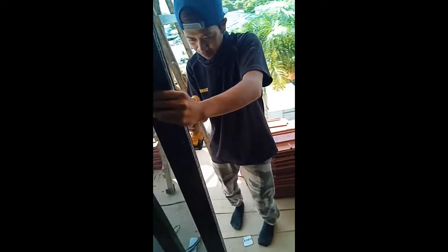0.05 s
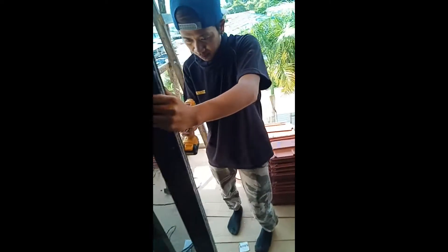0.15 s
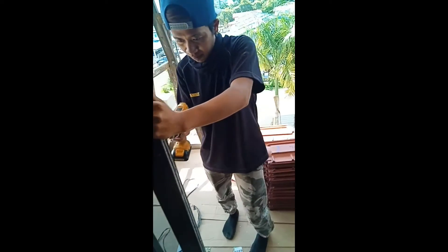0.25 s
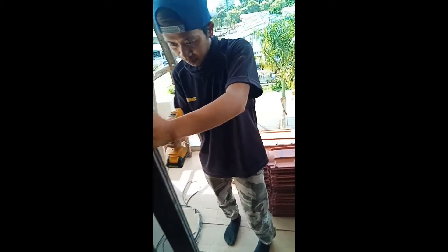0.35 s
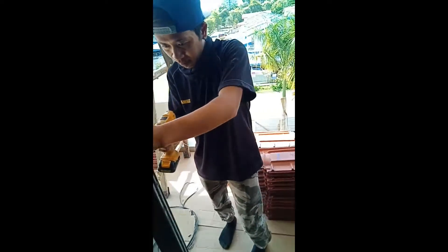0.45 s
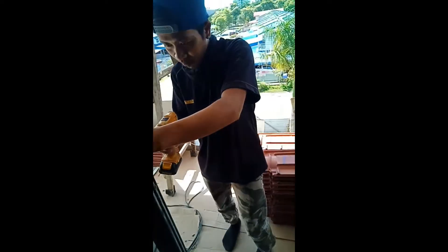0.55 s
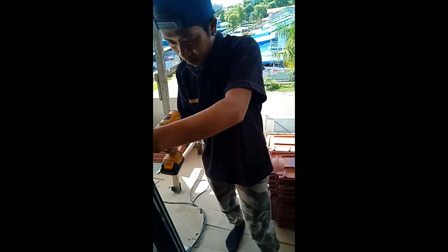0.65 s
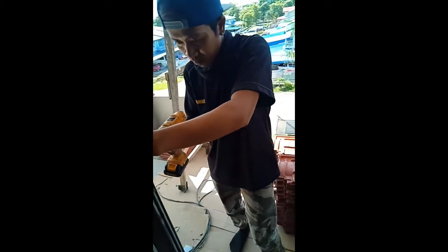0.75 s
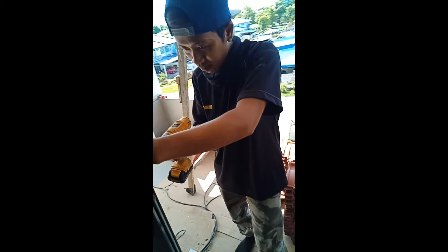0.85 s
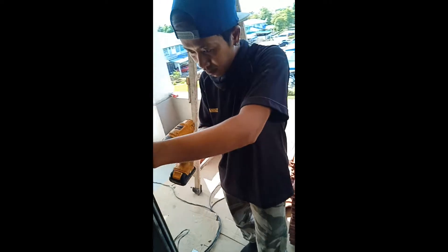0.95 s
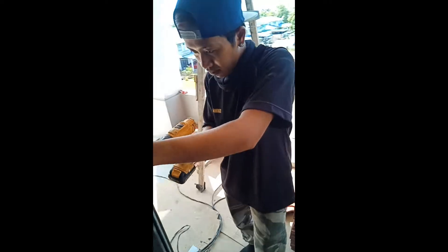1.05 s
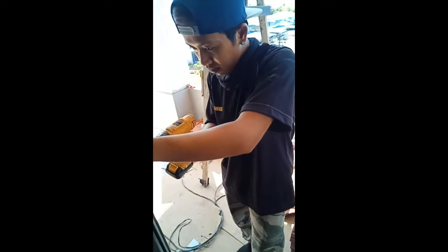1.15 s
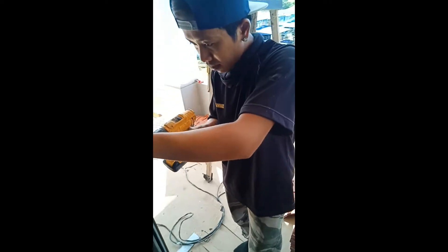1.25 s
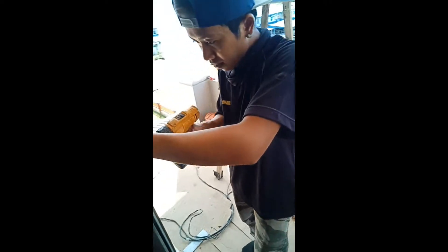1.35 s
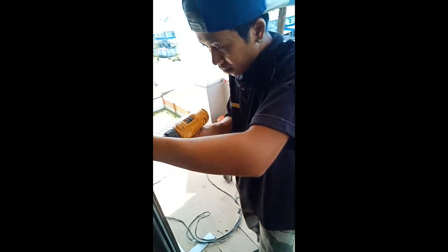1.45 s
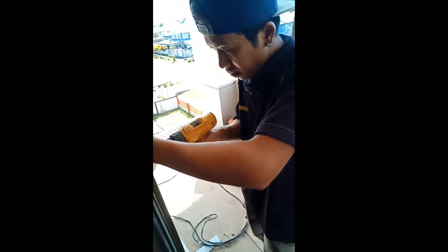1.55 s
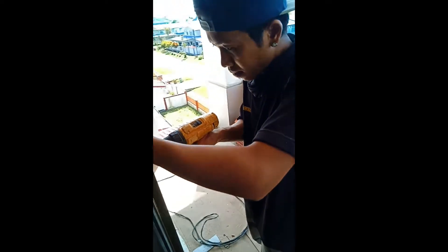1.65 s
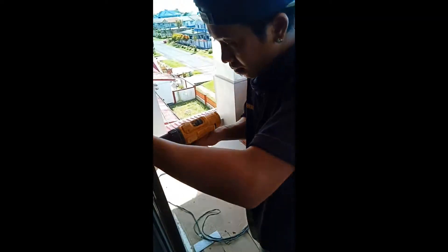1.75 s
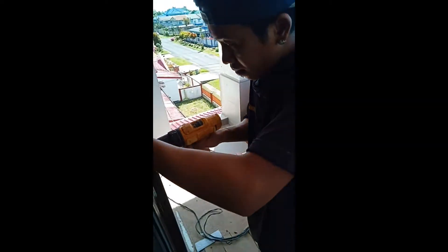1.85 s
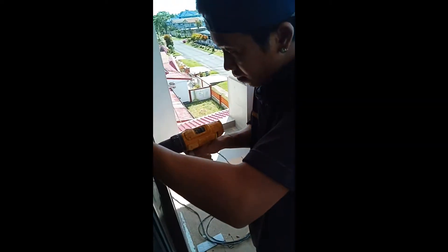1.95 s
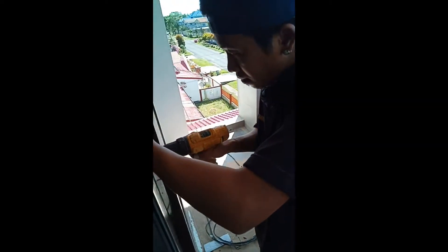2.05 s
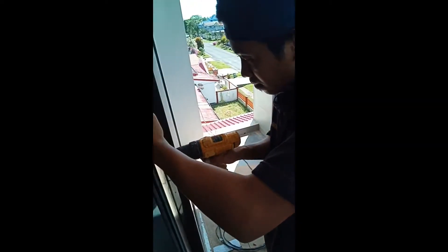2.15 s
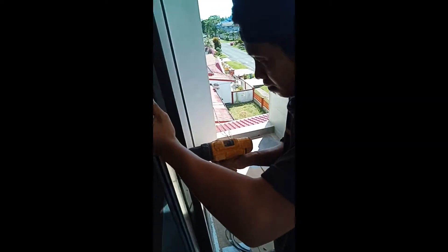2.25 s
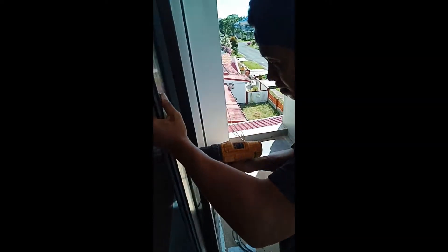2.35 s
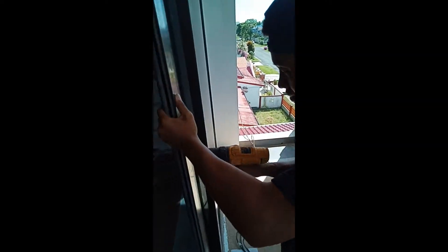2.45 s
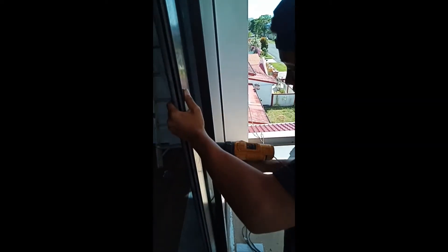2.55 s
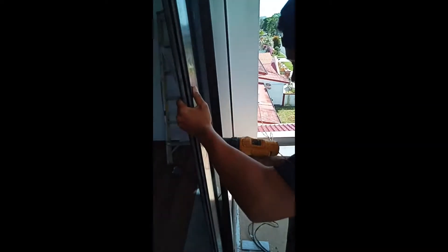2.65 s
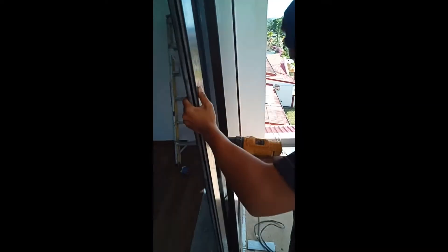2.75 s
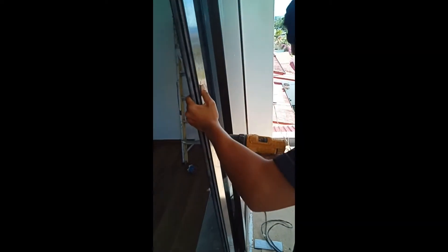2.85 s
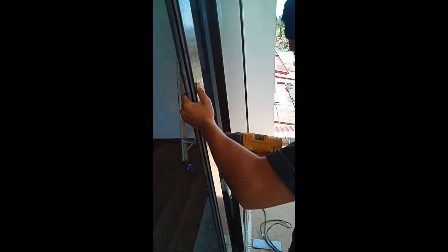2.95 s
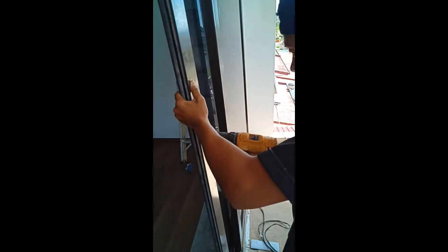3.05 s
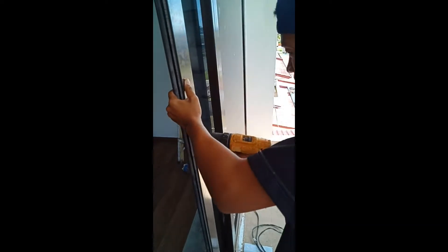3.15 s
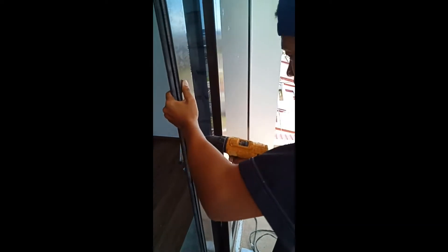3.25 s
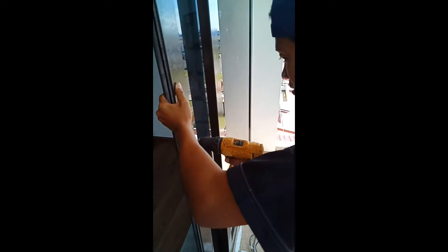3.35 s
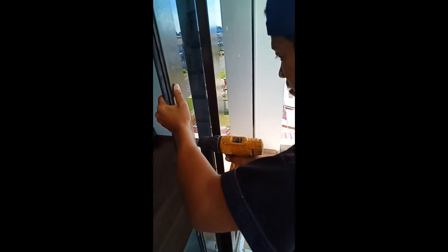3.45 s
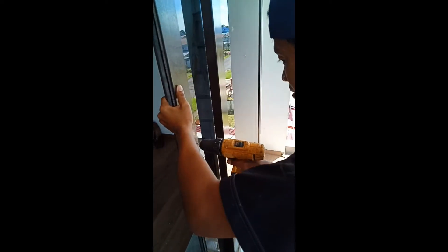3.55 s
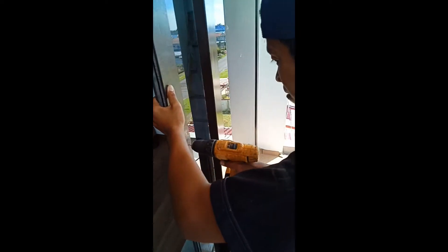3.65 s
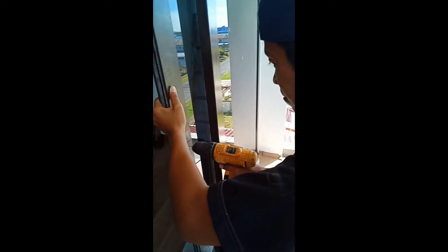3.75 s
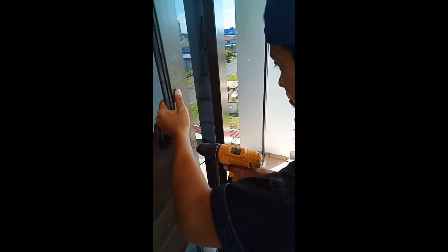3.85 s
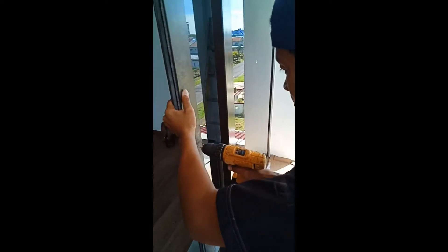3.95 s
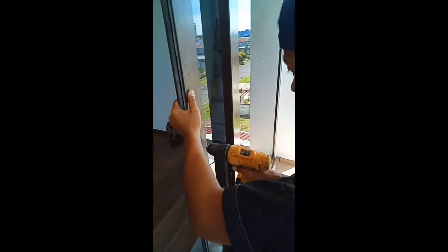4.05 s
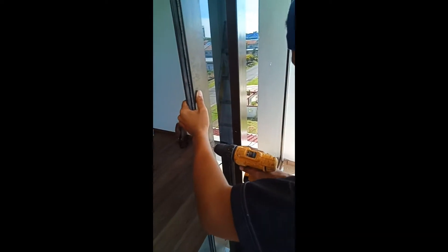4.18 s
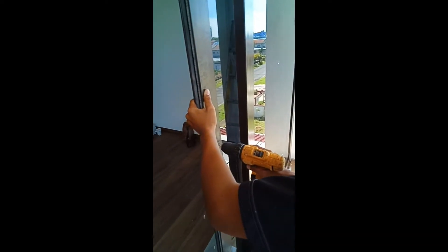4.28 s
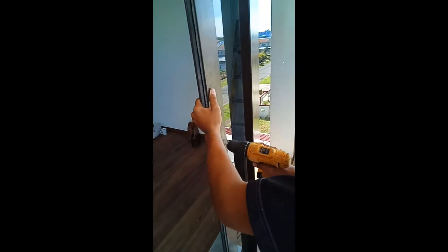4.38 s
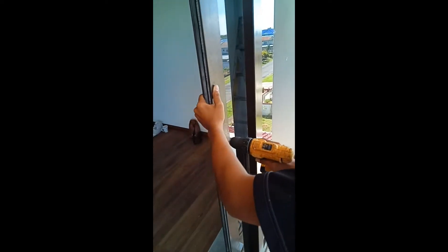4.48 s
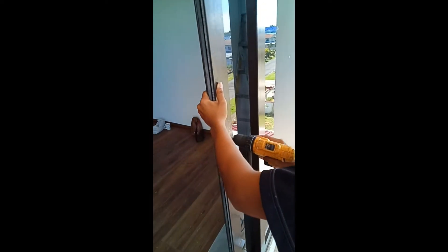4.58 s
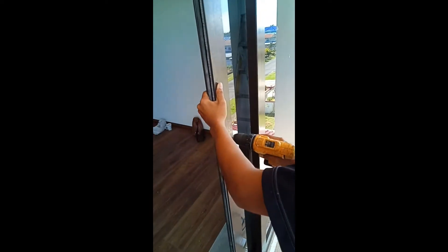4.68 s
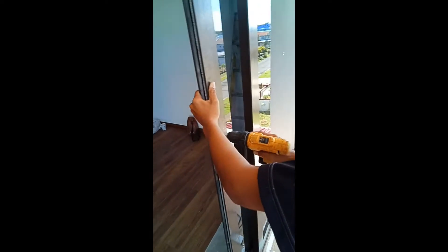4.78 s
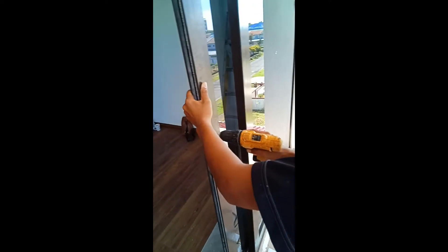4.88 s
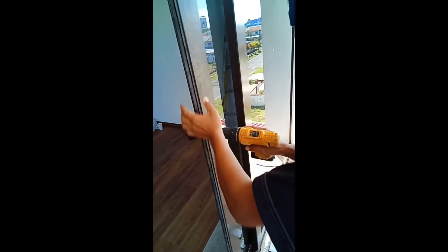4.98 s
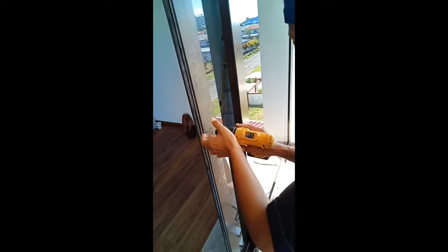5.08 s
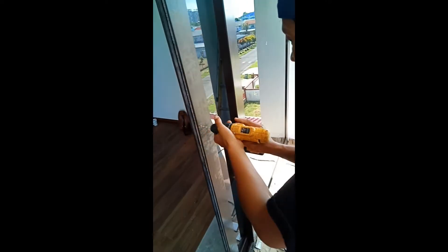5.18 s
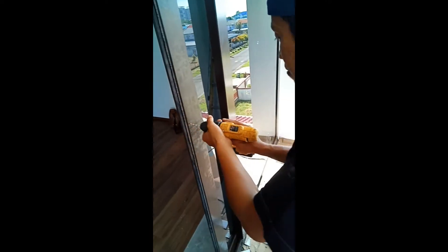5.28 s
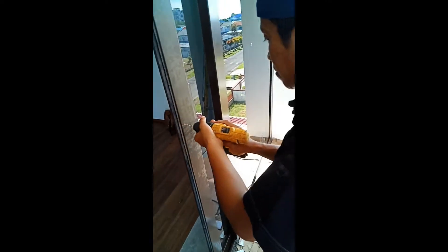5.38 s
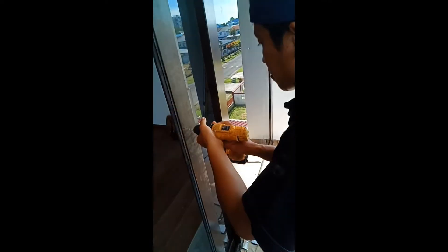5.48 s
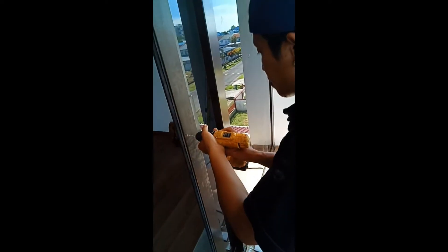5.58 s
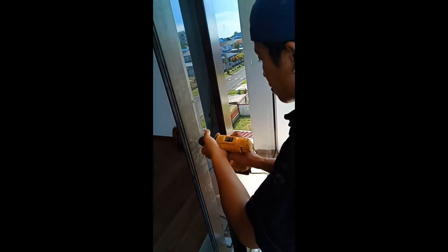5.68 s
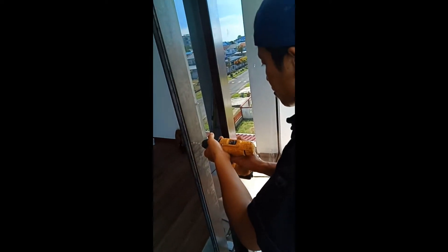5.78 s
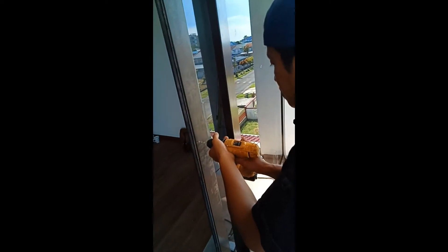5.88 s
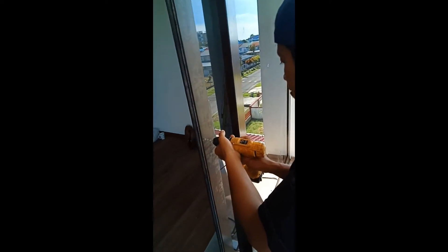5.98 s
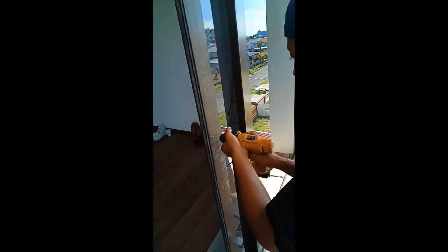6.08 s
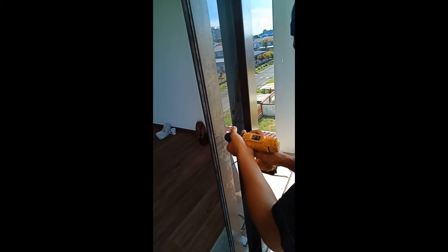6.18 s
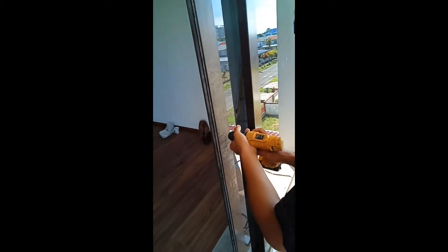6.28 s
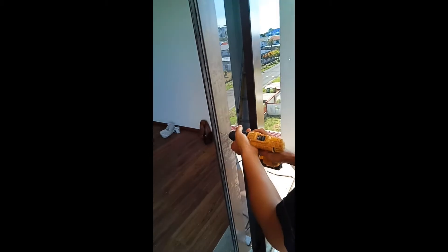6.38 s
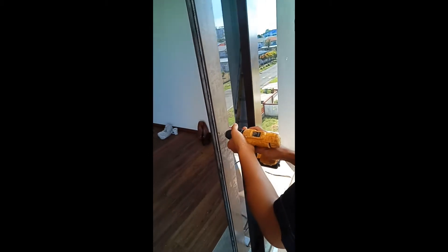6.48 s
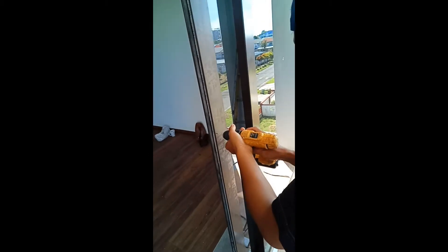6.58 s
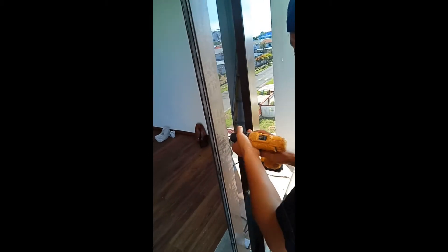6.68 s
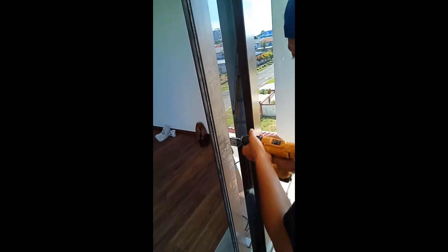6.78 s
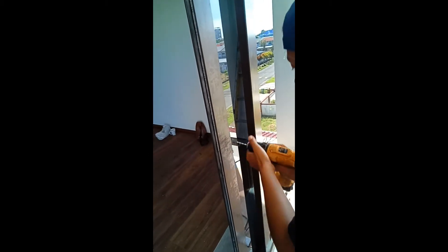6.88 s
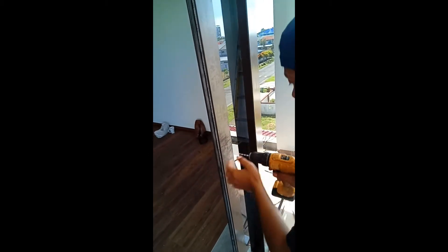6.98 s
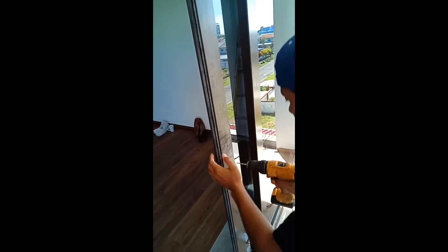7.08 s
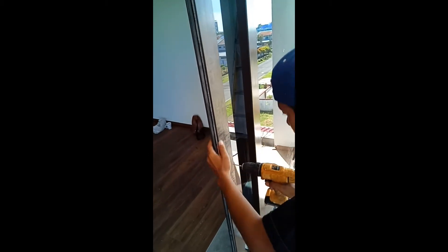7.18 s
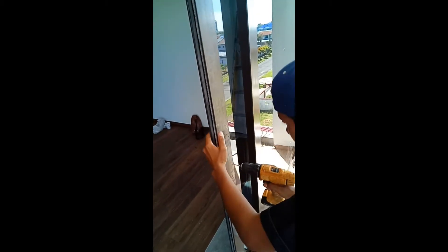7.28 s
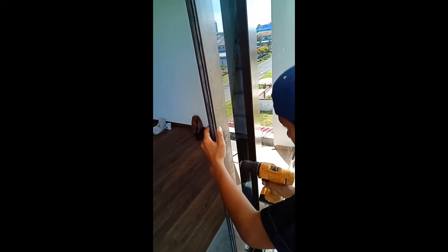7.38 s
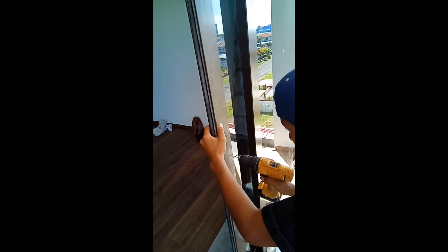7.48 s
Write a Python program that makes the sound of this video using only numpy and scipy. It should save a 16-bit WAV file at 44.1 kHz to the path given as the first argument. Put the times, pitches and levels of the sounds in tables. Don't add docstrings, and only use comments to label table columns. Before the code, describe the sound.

Quiet street hiss and soft wind rumble sit behind a drill at arm's length. A trigger tick and a faint whistle lead into a rising whine and dense gear rattle, held for about two seconds, then falling away with snaps. Later two short trigger bursts crackle, the second strongest and longer, stopped abruptly by the brake. The doorway adds a short echo; the phone sound is dry, bright and close.

```python
import sys
import numpy as np
from scipy import signal
from scipy.fft import rfft, irfft, next_fast_len
from scipy.io import wavfile
from scipy.ndimage import uniform_filter1d

SR = 44100
rng = np.random.default_rng(int(sys.argv[2]) if len(sys.argv) > 2 else 0)


def inscribe(sig):
    pcm = np.round(np.clip(np.atleast_2d(sig).T, -1, 1) * 32767)
    wavfile.write(sys.argv[1], SR, pcm.astype(np.int16))


def volts_from_decibels(level):
    exponent = np.asarray(level, float) / 20
    return 10 ** exponent


N = 331808

# (time [s], level [dB])
STREET_LEVEL = [(0, -50.5), (.4, -54), (1.6, -55), (2.5, -61.5), (5.2, -53), (7.52, -57)]
# (frequency [Hz], density [dB per Hz])
STREET_COLOUR = [(260, -57), (450, -40), (653, -19.5), (803, -9.5), (975, -8.5), (1150, -8.5), (1460, -10),
                 (1550, -11), (1770, -13), (2210, -15.5), (3500, -18.5), (4850, -39), (15700, -67.5)]
# (time [s], centre [Hz], level [dB])
DRONE = [(0, 953, -56), (.6, 1023, -59), (1.4, 1282, -54.5), (2.2, 1512, -51), (2.5, 1550, -54)]
# (middle [s], peak [dB], half length [s])
HUM = [(.7, -52, 0.31), (3.2, -51.5, 0.49), (4.4, -51.5, 0.41), (5.4, -53.5, .4), (6.12, -41, 0.17),
       (6.78, -39.5, .08), (7.05, -53, 0.19), (7.33, -47.5, 0.076)]

# (time [s], level [dB])
CALM = [(0, -54.5), (1.6, -48.5), (5.2, -51.5), (7.37, -51), (7.44, -63), (7.52, -49.5)]
# (middle [s], peak [dB], half length [s])
GUSTS = [(1.04, -51, 0.074), (1.16, -44.5, 0.11), (2.3, -42.5, 0.13), (2.95, -48, 0.098),
         (3.72, -42.5, .05), (3.92, -43, 0.048), (4.3, -38, 0.11), (4.45, -41.5, .05), (4.7, -44.5, .12),
         (5.45, -34, 0.037), (5.57, -35.5, 0.084), (5.78, -42.5, 0.12), (5.845, -41, 0.024),
         (6.38, -39, 0.18), (6.655, -26, 0.049), (6.76, -30, 0.063), (6.93, -37, .08)]
# (frequency [Hz], density [dB per Hz])
BREEZE_COLOUR = [(15, -68), (25, -33.5), (113, -4), (167, 1.5), (200, 0.5), (233, 0), (299, 0), (508, -5),
                 (560, -8), (700, -13), (910, -32.5), (1540, -120)]

# (time [s], level [dB])
CHOPPER_LEVEL = [(1.44, -69), (1.454, -44.5), (1.62, -44), (1.69, -67), (1.73, -52), (2.136, -38),
                 (2.244, -43), (2.3, -55)]

# (time [s], commutator pitch [Hz], commutator level [dB])
SPIN_UP = [(2.1, 1300, -51), (2.22, 1610, -47), (2.3, 2254, -42), (2.4, 2610, -28.5), (2.44, 2964, -34),
           (2.5, 3595, -26), (2.55, 3800, -32)]
BORING = [(2.7, 3920, -42), (2.8, 3987, -32), (3.06, 4000, -34.5), (3.27, 4007, -28.5), (3.32, 4005, -45),
          (3.65, 3975, -33), (3.9, 3933, -31), (4.12, 3945, -33)]
RUN_DOWN = [(4.2, 3694, -29.5), (4.27, 3473, -29), (4.33, 3245, -42), (4.41, 2810, -31), (4.49, 2600, -27),
            (4.53, 2201, -47)]
# (time [s], commutator pitch [Hz], level [dB])
STALLED = [(5.435, 2360, -30), (5.46, 2740, -29), (5.51, 2733, -34), (5.55, 2851, -32), (5.595, 2710, -28),
           (5.62, 2710, -40.5)]
HELD = [(6.1, 2600, -38.5), (6.16, 3331, -23.5), (6.235, 3508, -18.5), (6.295, 3460, -20),
        (6.32, 3107, -29), (6.39, 3428, -23), (6.5, 3400, -20), (6.61, 3874, -19.5), (6.695, 3497, -24.5)]
SINGING = [SPIN_UP + BORING + RUN_DOWN, STALLED, HELD]
# (multiple of its turn [1], level beside a steady rotor [dB])
TURN_LINES = [(.5, -49), (1, -52), (1.31, -54), (2, -58), (2.5, -52), (3, -45), (4, -49), (24, -75),
              (28, -84), (34, -82), (35, -82), (36, -84)]
COMMUTATOR_BARS = 12
TOP_SPEED_HZ, FREE_SPEED_HZ = 3786, 4000
WOBBLE_FROM_S, WOBBLE_TO_S, WOBBLE_PERIOD_S, WOBBLE_DEPTH = 6.157, 6.5, .051, .02

# (time [s], gear effort [dB], share passed into the frame [dB])
PULLS = [
    [(.9, -69.5, 11), (1.45, -52, 1.5), (1.6, -43, -4), (2.0, -40.5, -8), (2.55, -22, -11),
     (3.4, -24.5, -7.5), (4.45, -24, -8.5), (4.7, -27, -2.5), (4.9, -43.5, -3)],
    [(5.381, -26, -11), (5.407, -28.5, -9), (5.412, -22, -8.5), (5.58, -22.5, -11), (5.63, -28, -7.5),
     (5.69, -44, -1)],
    [(6.049, -25.5, -6.5), (6.075, -23, -5), (6.08, -19, -4.5), (6.14, -23, -5.5), (6.19, -18, -14.5),
     (6.57, -21.5, -10.5), (6.64, -17.5, -9.5), (6.71, -21, -4), (6.77, -36, -1)],
]
RING_OFF_DB_PER_S, RING_OFF_SHARE_DB, RING_OFF_S = 41, -3.5, .75
# (time [s], peak [dB])
JOLTS = [
    (1.2, -50),
    (5.185, -38),
    (5.414, -19),
    (5.826, -28.5),
    (6.079, -19),
    (6.719, -14.5),
]
JOLT_DB_PER_S = 501.5
# (frequency [Hz], density [dB per Hz])
RATTLE_COLOUR = [(940, -47), (1600, -19.5), (2320, -5), (2720, -0.5), (3580, 4), (3770, 1), (3910, 1.5),
                 (4090, -3.5), (4180, -4), (4820, -17.5), (5640, -25), (7160, -31), (9500, -54.5),
                 (12400, -83), (20900, -120)]
FRAME_COLOUR = [(210, -43), (350, -10.5), (438, -13.5), (703, -10), (978, -7), (1060, -5), (1290, -0.5),
                (1560, -6.5), (2100, -4.5), (2730, -11.5), (4620, -120)]
BRUSH_COLOUR = [(5000, -35), (8500, -9.5), (10100, -15), (11400, -7), (12700, -13.5), (14800, -0.5),
                (15300, -0.5), (15700, -2)]
# (frequency [Hz], width [Hz], level [dB])
CHATTER = [(2686, 34, -27), (2938, 100, -23.5), (3280, 190, -30), (3477, 30, -26.5), (3550, 26, -29),
           (3780, 120, -24.5), (4510, 370, -28), (5210, 340, -37.5), (6180, 460, -37), (6950, 340, -41.5),
           (7890, 320, -49)]
BRUSH_DB, BRUSH_SLOW_DB = -32.5, -21

# (middle [s], peak [dB], half length [s], centre [Hz])
GRIND = [
    (2.27, -46, 0.16, 581),
    (3.3, -36.5, 0.21, 1311),
    (4.45, -36.5, .06, 1149),
    (4.66, -34.5, 0.1, 1181),
    (4.739, -37.5, 0.088, 1478),
    (6.185, -32, 0.096, 1320),
    (6.43, -33.5, .13, 1337),
]

# (time [s], peak [dB], ring [Hz])
CATCHES = [
    (4.3231, -7, 3650),
    (4.3316, -9, 3580),
    (4.4094, -11.5, 3700),
    (4.4194, -7, 3288),
    (4.9462, -34, 2760),
    (5.3812, -18.5, 2983),
    (5.5664, -17.5, 2722),
    (6.3294, -10, 3220),
    (6.6914, -13.5, 3800),
]
# (time [s], peak [dB], ring [Hz])
TICKS = [(1.5179, -21, 3410), (5.1382, -28.5, 3683), (5.1801, -23, 3110), (5.1874, -23.5, 3820),
         (5.2084, -31, 3540), (5.5543, -9.5, 3666), (5.6154, -15, 2696), (5.6491, -14.5, 2740),
         (5.8242, -15.5, 2820), (5.8394, -26.5, 2680), (6.0367, -28, 3770), (6.1868, -6, 3280)]
# (time [s], peak [dB], ring [Hz])
CLUNKS = [(5.4003, -15, 3600), (5.4094, 0, 3600), (5.4122, -9, 3700), (5.4183, -10, 2800),
          (5.4215, -9, 2300), (6.0503, -6, 3750), (6.059, -19, 3300), (6.0684, -14, 3900),
          (6.0768, -8, 3800), (6.0788, -3, 3600), (6.7155, -11, 3400), (6.7193, -5, 3600),
          (6.7215, -5, 3700), (6.7305, -10, 3500)]
# (frequency [Hz], level [dB])
GRIT_COLOUR = [(250, -26), (1200, -9), (2500, 3.5), (3700, -1.5), (4500, 3.5), (5200, -21.5), (7000, -40),
               (9500, -57), (12000, -43), (15000, -49)]
SNAP_COLOUR = [(3500, -28), (5000, 3), (6500, 2.5), (8500, -16.5), (10000, -19.5), (12000, -16),
               (15000, -18.5)]
CLICK_T60_S, CATCH_SNAP_DB, TICK_SNAP_DB, CLUNK_SNAP_DB = .012, -25.5, -39.5, -39.5


def unit(x):
    return x / np.sqrt(np.mean(x ** 2))


def curve(rows, column, outside):
    rows = np.array(rows, float)
    return np.interp(np.arange(N) / SR, rows[:, 0], rows[:, column], outside, outside)


def gain(tables, column):
    return sum(volts_from_decibels(curve(rows, column, -np.inf)) for rows in tables)


def swells(rows):
    t = np.arange(N) / SR
    return sum(volts_from_decibels(row[1]) * np.exp(-((t - row[0]) / row[2]) ** 2) for row in rows)


def walk(rate):
    hold = int(SR / rate)
    steps = np.repeat(rng.standard_normal(N // hold + 1), hold)
    return 1.295 * uniform_filter1d(uniform_filter1d(steps, hold), hold)[:N]


def colour(x, points):
    size = next_fast_len(N + 8192)
    hz, db = np.transpose(points)
    log_hz = np.log(np.arange(size // 2 + 1) * SR / size + 1)
    cepstrum = irfft(np.interp(log_hz, np.log(hz), db) * np.log(10) / 20, size)
    cepstrum[1:size // 2] *= 2
    cepstrum[size // 2 + 1:] = 0
    return irfft(rfft(x, size) * np.exp(rfft(cepstrum)), size)[:N]


def ring(x, hz, width_hz):
    b, a = signal.iirpeak(hz, hz / width_hz / 2.07, SR)
    return signal.lfilter(b, a, signal.lfilter(b, a, x))


def hum_band(hz, size, width_hz):
    angle = 2 * np.pi * np.cumsum(hz) / SR
    return size * (walk(width_hz) * np.sin(angle) + walk(width_hz) * np.cos(angle))


def street():
    traffic = colour(rng.standard_normal(N), STREET_COLOUR)
    hiss = gain([STREET_LEVEL], 1) * unit(volts_from_decibels(0.71 * walk(8.8)) * traffic)
    drone = hum_band(curve(DRONE, 1, None), gain([DRONE], 2), width_hz=250)
    hum = (swells(HUM) + volts_from_decibels(-62)) * unit(ring(rng.standard_normal(N), hz=134.5, width_hz=23))
    return hiss + drone + hum


def breeze():
    shake = volts_from_decibels(-27.5) * gain(PULLS, 1)
    push = gain([CALM], 1) + swells(GUSTS) + shake
    return push * unit(volts_from_decibels(2.54 * walk(15)) * colour(rng.standard_normal(N), BREEZE_COLOUR))


def clicks():
    shell, snap, t = np.zeros(N), np.zeros(N), np.arange(4096) / SR
    grit = unit(colour(rng.standard_normal(N), GRIT_COLOUR))
    fizz = unit(colour(rng.standard_normal(N), SNAP_COLOUR))
    rise = np.sin(np.minimum(t / 0.0015, .5) * np.pi) ** 2
    fade = np.exp(-np.log(1000) * t / CLICK_T60_S) * rise
    for rows, snap_db in (CATCHES, CATCH_SNAP_DB), (TICKS, TICK_SNAP_DB), (CLUNKS, CLUNK_SNAP_DB):
        for s, db, hz in rows:
            i = int(s * SR)
            span = slice(i, i + len(t))
            hit = fade * (np.sin(2 * np.pi * hz * t) + .5 * grit[span])
            shell[span] += volts_from_decibels(db - .5) * hit / np.abs(hit).max()
            snap[span] += volts_from_decibels(db + snap_db + 2.0) * fade ** 0.44 * fizz[span]
    return colour(shell, [(4600, 0.0), (5600, -15), (9000, -33)]) + snap


def chopper():
    angle = 2 * np.pi * 3946 * np.arange(N) / SR
    return np.sqrt(2) * gain([CHOPPER_LEVEL], 1) * volts_from_decibels(0.85 * walk(46.0)) * np.sin(angle)


def grind():
    return sum(hum_band(np.full(N, row[3]), swells([row]), width_hz=.23 * row[3]) for row in GRIND)


def speed():
    t = np.arange(N) / SR
    slipping = (t > WOBBLE_FROM_S) * (t < WOBBLE_TO_S)
    wobble = WOBBLE_DEPTH * np.sin(2 * np.pi * (t - WOBBLE_FROM_S) / WOBBLE_PERIOD_S) * slipping
    return uniform_filter1d(curve(np.concatenate(SINGING), 1, None) * (1 + wobble), size=300)


def rotor():
    hz = speed()
    slip = np.clip(1 - hz / TOP_SPEED_HZ, 0, 1)
    trembling_hz = hz * (1 + (.001 + .012 * slip) * walk(150))
    angle = 2 * np.pi * np.cumsum(trembling_hz) / COMMUTATOR_BARS / SR
    level = gain(SINGING, 2)
    whine = uniform_filter1d(level, size=200) * volts_from_decibels(2.8 * walk(120)) * np.sin(COMMUTATOR_BARS * angle)
    running = uniform_filter1d((level > 0) * 1., size=800) * (hz / TOP_SPEED_HZ) ** 4.3
    lines = sum(volts_from_decibels(db + 2.4 * walk(30)) * np.sin(k * angle + k * k) for k, db in TURN_LINES)
    return np.sqrt(2) * (whine + running * lines), angle


def knocks(angle, scatter_db, throb):
    size = volts_from_decibels(scatter_db * np.minimum(walk(400), 2) + 1.15 * walk(25))
    return rng.standard_normal(N) * size * (1 + throb * np.cos(angle))


def efforts():
    tables = []
    for rows in PULLS:
        end_s, end_db, _ = rows[-1]
        faded_db = end_db - RING_OFF_DB_PER_S * RING_OFF_S
        tables.append(rows + [(end_s + RING_OFF_S, faded_db, RING_OFF_SHARE_DB)])
    for s, db in JOLTS:
        tables.append([(s - .003, db - 20, -9), (s, db, -9), (s + 40 / JOLT_DB_PER_S, db - 45, -4)])
    return tables


def gears(angle):
    rattle = unit(colour(knocks(angle, scatter_db=0.8, throb=0.23), RATTLE_COLOUR))
    frame = unit(colour(knocks(angle, scatter_db=1.5, throb=0.31), FRAME_COLOUR))
    flares = sum(volts_from_decibels(db + 5.6 * walk(12)) * unit(ring(rattle + frame, hz, width_hz))
                 for hz, width_hz, db in CHATTER)
    brush = unit(colour(knocks(angle, scatter_db=0.5, throb=.3), BRUSH_COLOUR))
    slowness = np.clip(1 - speed() / FREE_SPEED_HZ, 0, .3)
    brush = brush * volts_from_decibels(BRUSH_DB + BRUSH_SLOW_DB * slowness)
    out = 0
    for rows in efforts():
        sparking = np.clip((curve(rows, 1, None) + 50) / 14, 0, 1)
        frame_share = volts_from_decibels(curve(rows, 2, None) - 2.0)
        mix = volts_from_decibels(-3.0) * rattle + flares + frame_share * frame + sparking * brush
        out = out + gain([rows], 1) * mix
    return out


def doorway(drill):
    t = np.arange(SR) / SR
    tail = rng.standard_normal(SR) * np.exp(-np.log(1000) * t / 0.73) * (t > .004)
    return volts_from_decibels(-10.5) * signal.fftconvolve(drill, tail / np.sqrt(np.sum(tail ** 2)))[:N]


def scene():
    whine, angle = rotor()
    drill = whine + chopper() + gears(angle) + grind() + clicks()
    return (street() + breeze() + doorway(drill) + drill)[None]


def band_limit(x):
    return signal.sosfilt(signal.butter(12, 16700, fs=SR, output="sos"), x)


def record(dry):
    x = dry + volts_from_decibels(-78.5) * rng.standard_normal(dry.shape)
    x = signal.sosfilt(signal.butter(2, 45, "high", fs=SR, output="sos"), x)
    x = np.clip(x, -.97, .97)
    x = signal.sosfilt(signal.ellip(10, .2, 60, 15650, fs=SR, output="sos"), x)
    return band_limit(x)


dry = scene()
out = record(dry)
inscribe(out)
```